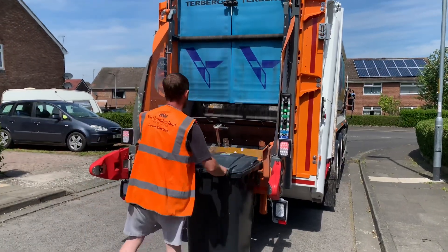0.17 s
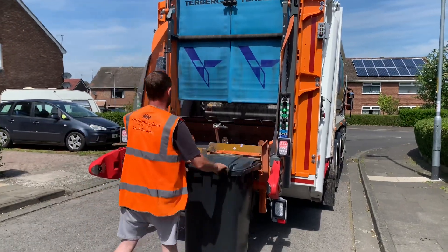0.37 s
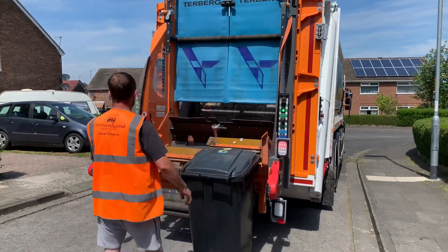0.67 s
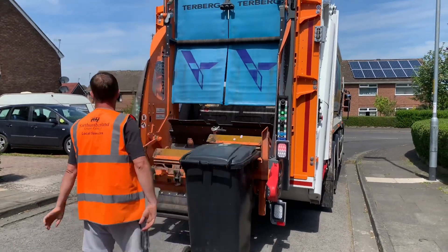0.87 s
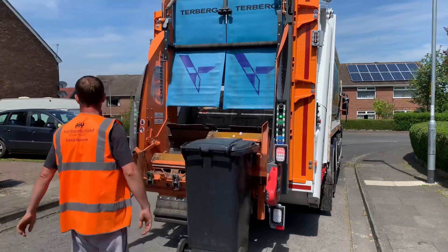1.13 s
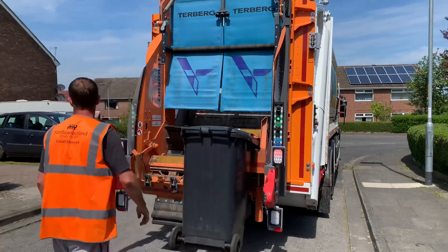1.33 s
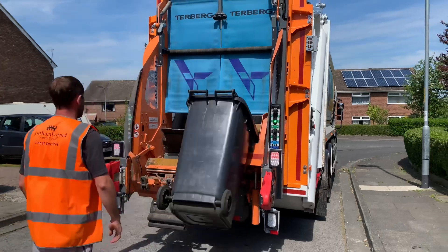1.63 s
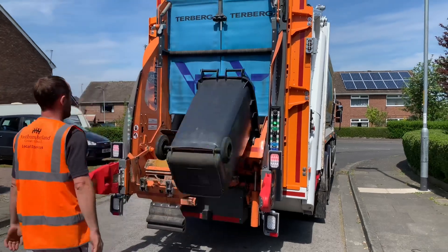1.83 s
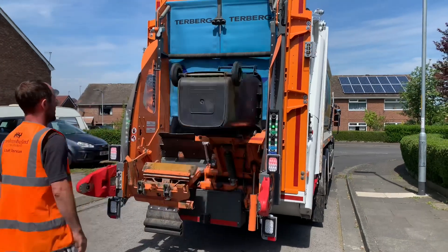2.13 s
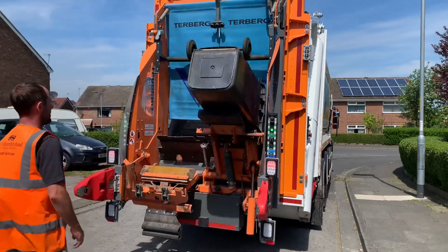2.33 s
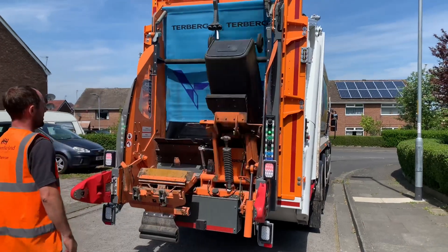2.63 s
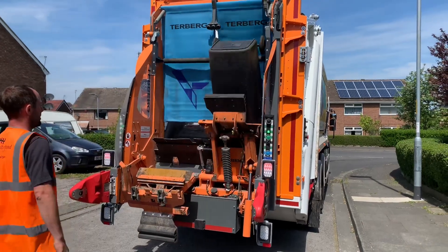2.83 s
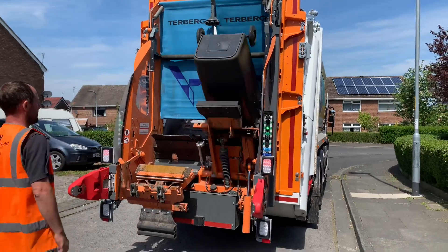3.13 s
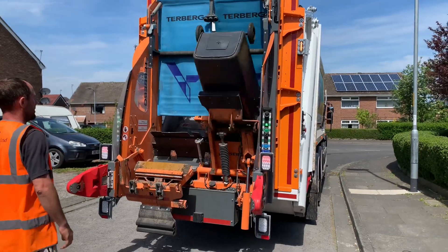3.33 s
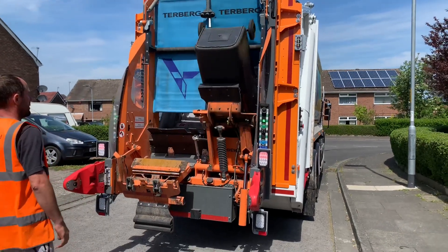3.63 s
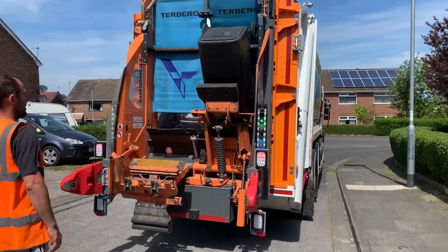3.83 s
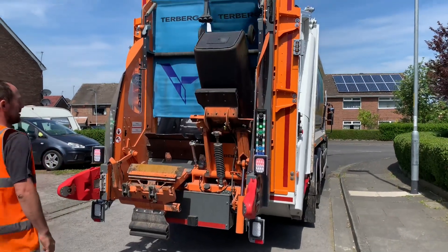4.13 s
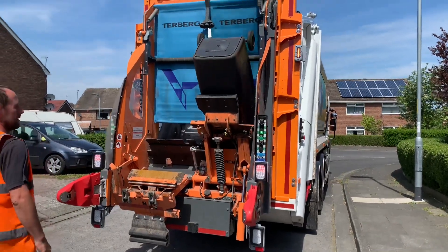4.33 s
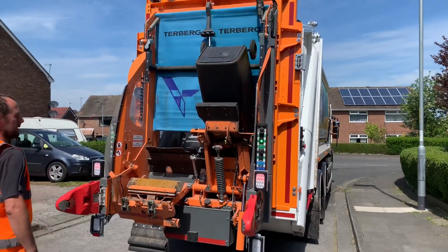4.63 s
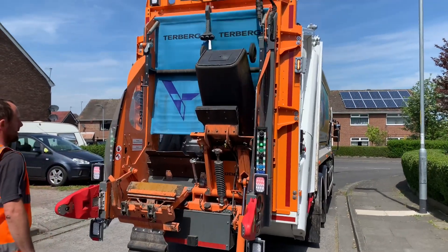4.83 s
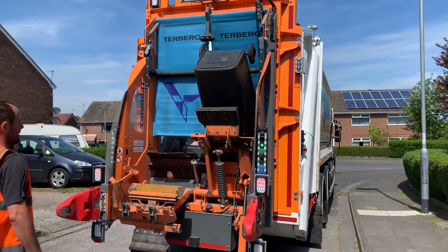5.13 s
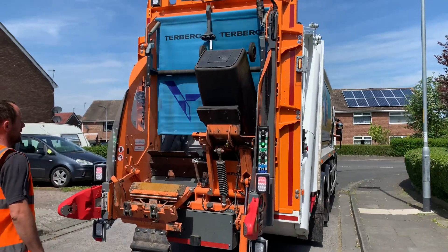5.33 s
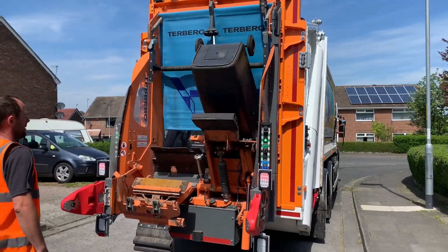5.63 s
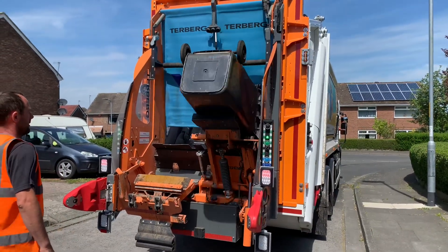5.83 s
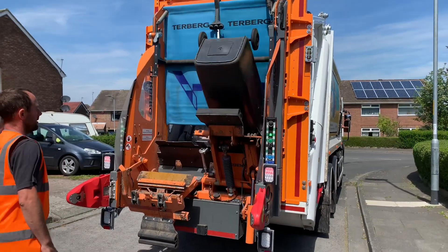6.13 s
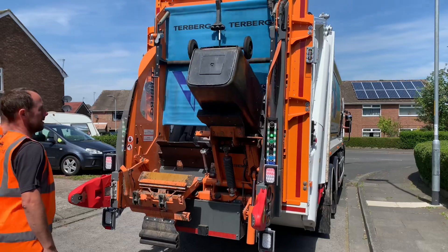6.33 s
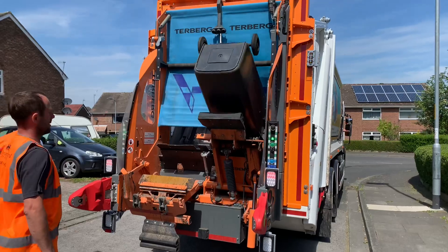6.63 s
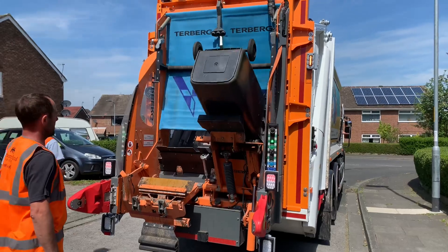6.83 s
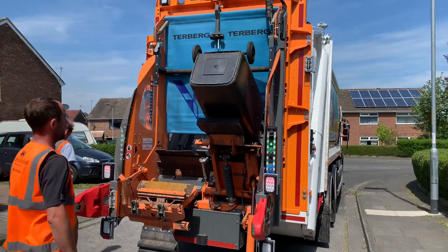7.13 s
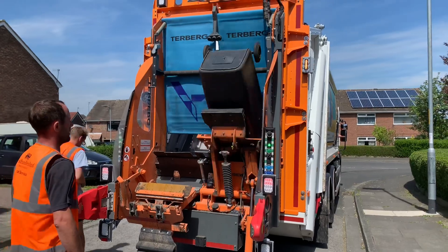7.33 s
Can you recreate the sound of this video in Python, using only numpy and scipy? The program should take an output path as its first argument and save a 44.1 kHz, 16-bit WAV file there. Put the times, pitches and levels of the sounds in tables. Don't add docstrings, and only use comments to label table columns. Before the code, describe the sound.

A refuse truck's hydraulic lift hisses and whistles as a plastic wheelie bin bangs, shakes out rattling rubbish, with wind buffeting the microphone.

```python
import sys
import numpy as np
from scipy import signal
from scipy.fft import rfft, irfft, next_fast_len
from scipy.io import wavfile
from scipy.ndimage import uniform_filter1d, map_coordinates

SR = 44100
rng = np.random.default_rng(int(sys.argv[2]) if len(sys.argv) > 2 else 0)


def convert_level_to_amplitude(level_db):
    exponent = np.asarray(level_db, float) / 20
    return 10 ** exponent


def int16_out(signal):
    q = np.round(np.clip(np.atleast_2d(signal).T, -1, 1) * 32767)
    wavfile.write(sys.argv[1], SR, q.astype(np.int16))


N = 330309


def unit(x):
    return x / np.sqrt(np.mean(x ** 2) + 1e-20)


def along(points, hz):
    f, v = np.transpose(points)
    return np.interp(np.log(hz + 1), np.log(f + 1), v)


def curves(rows):
    s, *cols = np.transpose(rows)
    return [np.interp(np.arange(N) / SR, s, c) for c in cols]


def wobble(rate_hz):
    coarse = np.arange(0, N + 8, 8)
    knots = rng.standard_normal(int(N * rate_hz / SR) + 4)
    return np.interp(np.arange(N), coarse, map_coordinates(knots, [coarse * rate_hz / SR]))


def filtered(x, response):
    m = next_fast_len(N + 8192)
    return irfft(rfft(x, m) * response(np.fft.rfftfreq(m, 1 / SR)), m)[..., :N]


def rush(spectrum, patchy_db=0):
    z = signal.stft(rng.standard_normal((2, N)), nperseg=512)[2]
    field = uniform_filter1d(rng.standard_normal(z.shape[1:]), size=6, axis=0)
    field = uniform_filter1d(field, size=8, axis=1)
    pair = signal.istft(z * convert_level_to_amplitude(patchy_db * unit(field)), nperseg=512)[1][:, :N]
    return unit(filtered(pair, lambda hz: convert_level_to_amplitude(along(spectrum, hz))))


def bursts(times_s, dbs, t60s, rise_s=0.0026):
    power, t = np.zeros(N + SR), np.arange(SR // 3) / SR
    for s, db, t60 in zip(times_s, dbs, t60s):
        decay = convert_level_to_amplitude(db - 60 * t / max(t60, .01))
        power[round(s * SR):][:len(t)] += (decay * (1 - np.exp(-t / rise_s))) ** 2
    return np.sqrt(power[:N])


def swells(times_s, dbs, rises, falls):
    coarse = np.arange(0, N + 64, 64)
    late = coarse[:, None] / SR - times_s
    drop_db = 10 * np.maximum(late / np.abs(falls), -late / np.abs(rises))
    power = convert_level_to_amplitude(2 * (dbs - drop_db)).sum(axis=1)
    return np.interp(np.arange(N), coarse, np.sqrt(power))


def ring(rows, rise_s=0.0016):
    out, t = np.zeros(N + SR), np.arange(SR // 2) / SR
    for s, db, hz, t60 in rows:
        swell = convert_level_to_amplitude(db - 60 * t / t60) * (1 - np.exp(-t / rise_s))
        out[round(s * SR):][:len(t)] += swell * np.sin(2 * np.pi * hz * t)
    return out[:N]


# opens_s, shuts_s, hiss_db, whistle_start_hz, whistle_db
PUSHES = [(0.0, 0.986, -36.5, 10550, -44.5), (0.997, 1.453, -37.5, 6570, -59),
          (1.466, 1.597, -37.5, 7300, -48), (1.6, 1.89, -36, 7250, -45.5), (1.892, 2.203, -35, 7370, -44.5),
          (2.198, 2.528, -34.5, 7140, -44.5), (2.535, 2.594, -33, 7320, -45),
          (2.622, 2.842, -50, 7600, -52.5), (2.842, 2.954, -31.5, 11060, -60),
          (2.957, 3.026, -32, 11200, -41), (3.044, 3.076, -29, 11020, -40),
          (3.068, 3.208, -29.5, 11120, -36.5), (3.219, 3.29, -35, 9200, -57),
          (3.311, 3.412, -29.5, 10900, -38), (3.404, 3.507, -27.5, 10530, -39.5),
          (3.512, 4.147, -35, 10320, -37.5), (5.002, 5.5, -54.5, 7040, -80),
          (5.545, 6.242, -48, 9120, -79.5), (6.235, 6.344, -35, 10200, -44.5),
          (6.339, 6.423, -33, 11000, -40.5), (6.433, 7.117, -34.5, 11220, -39),
          (7.119, 7.223, -48, 8420, -65), (7.226, 7.29, -35.5, 8850, -39), (7.296, 7.355, -45, 9000, -60),
          (7.36, 7.43, -36, 9520, -39), (7.438, 7.602, -34.5, 10040, -37.5)]
TOP_S, SHAKEN_S = 2.7, 5
LIFT_HZ, LOWER_HZ = 6600, 6110
LIFT_S, LOWER_S, AGAIN_S = .11, .175, .125
STICK = .5
SURGE_DB, SHRILL_DB, LEAK_DB = 1, 6.5, -61


def spool():
    t = np.arange(N) / SR
    current = np.searchsorted(np.transpose(PUSHES)[0][1:], t)
    opens_s, shuts_s, hiss_db, start_hz, whistle_db = np.array(PUSHES)[current].T
    travel = (t - opens_s) / np.select([t < TOP_S, t < SHAKEN_S], [LIFT_S, LOWER_S], AGAIN_S)
    narrow = np.exp(STICK - np.hypot(travel, STICK))
    open_hz = np.where(t < TOP_S, LIFT_HZ, LOWER_HZ)
    centre_hz = open_hz + (start_hz - open_hz) * narrow
    flowing = lambda db: uniform_filter1d(convert_level_to_amplitude(db) * (t < shuts_s), size=1100)
    shrill = flowing(whistle_db + SHRILL_DB * narrow)
    flow = flowing(hiss_db + SURGE_DB * narrow) + convert_level_to_amplitude(LEAK_DB)
    return centre_hz, shrill, flow


# freq_hz, level_db (per Hz)
OIL = [(1500, -5), (3000, -5.5), (5000, -2.5), (6500, -2), (8200, 4), (12000, 2.5), (15500, 4),
       (16500, -13)]
RAGGED_RAD = .85


def valve():
    centre_hz, shrill, flow = spool()
    angle = 2 * np.pi * np.cumsum(centre_hz * (1 + 0.01 * wobble(30))) / SR

    def fuzz(width_hz):
        noise = rng.standard_normal((2, N))
        return unit(filtered(noise, lambda hz: 1 / (1 + (hz / width_hz) ** 2)))

    near, wide = fuzz(330), fuzz(600)
    tone = near * np.cos(angle + RAGGED_RAD * (centre_hz / LOWER_HZ - 1) * wide[0])
    octave = convert_level_to_amplitude(-3) * wide * np.cos(2 * angle) * (centre_hz < SR / 5)
    hiss = flow * convert_level_to_amplitude(3.0 + 1.0 * wobble(30)) * rush(OIL, patchy_db=1.4)
    return hiss + shrill * convert_level_to_amplitude(6.0) * (tone + octave)


# start_s, crack_db, boom_db, knock_db (boom and knock relative to crack)
BLOWS = [(0.194, -28, -15, 15.5), (0.263, -19, 12, -4), (0.7608, -23.5, 12.5, -1.5), (1.378, -23, 5, -4),
         (1.397, -17.5, 6.5, -7), (1.4408, -23, 13, 9.5), (1.902, -24, -18, -25), (2.37, -23, -1.5, -7),
         (2.5894, -36.5, 11, 17.5), (2.7725, -22.5, -15, 4), (2.8516, -21, 8.5, 5), (3.073, -20.5, 5, -11),
         (3.151, -16.5, 11.5, 5.5), (3.197, -16.5, -7, -6), (3.3198, -26.5, 18, 7),
         (3.3582, -15, 10.5, 6.5), (3.4995, -27, 18.5, 16), (4.169, -29, 11, 8.5),
         (4.2273, -24.5, 10.5, -16), (5.0715, -27.5, -15, 1), (5.5504, -29.5, -3, 6.5),
         (5.5773, -22, -6, -12), (5.7335, -24.5, 5, 4), (5.7522, -22, 12, 9), (5.881, -23.5, 12, 1.5),
         (5.9434, -21.5, -11, 0.5), (6.111, -23.5, -11, -6), (7.154, -27, 7, 8), (7.177, -22.5, 5, 2),
         (7.42, -26.5, 16.5, 10), (0.445, -26.5, 6, -6), (0.61, -24.5, -3, 2), (1.362, -27, 12, 4.5),
         (1.466, -27, 1, 1), (1.492, -23.5, 5, -4), (1.541, -27, -0.5, -14), (1.596, -23, 1, -10),
         (2.622, -30.5, 16, 6), (2.815, -45, 3, 3), (3.047, -29, 4, 2), (3.134, -29.5, 8, 9),
         (3.24, -20, -5, -13), (3.41, -18, 4, -11), (3.551, -35, 9, 4), (5.785, -24, 0, -15),
         (7.238, -26, 1, 5), (7.381, -34, 6, 10)]
# freq_hz, level_db (per Hz)
BOOM = [(60, -15), (150, -3), (280, 3), (500, -5), (800, -13.5), (1500, -67)]
KNOCK = [(400, -33), (750, 6), (1300, 2), (2000, -6), (3000, -23)]
CRACK = [(1200, -5), (2200, 5.5), (4000, -4.5), (7000, -4), (12000, -12), (16000, -19)]


def bin_blows():
    s, db, boom_db, knock_db = np.transpose(BLOWS)
    t60_s = 0.17 * convert_level_to_amplitude(0.29 * (db + 22.5))
    snap = bursts(s, db - 3, .12 * t60_s, rise_s=.0002)
    crack = (snap + bursts(s, db - 12.5, 1.1 * t60_s)) * rush(CRACK)
    knock_body = bursts(s, db + knock_db - 6.5, 1.36 * t60_s, rise_s=0.00082)
    knock = (snap * convert_level_to_amplitude(-26.0) + knock_body) * rush(KNOCK, patchy_db=4.0)
    boom = bursts(s, db + boom_db - 5.5, 2.0 * t60_s, rise_s=0.0051) * rush(BOOM)
    return crack + knock + boom


# start_s, peak_db, pitch_hz, t60_s
HOLLOW = [(.262, -11, 820, 0.043), (1.39, -20, 803, 0.077), (1.44, -5.5, 195, 0.21),
          (3.012, -13, 850, 0.064), (3.021, -5.5, 873, 0.076), (2.875, -18, 764, 0.12),
          (2.855, -23, 1316, 0.091), (3.156, -17, 795, 0.28), (3.36, -13.5, 816, 0.15),
          (3.42, -19, 766, 0.2), (3.362, -18, 531, 0.15), (3.365, -20, 1118, 0.13), (3.5, -19, 1184, 0.07),
          (.196, -28, 2300, .08), (5.498, -26.5, 647, .2), (5.572, -29, 1003, .12), (5.669, -27.5, 715, .1),
          (5.941, -16.5, 1220, 0.041), (6.112, -26, 2096, 0.062), (5.89, -23, 1210, 0.063),
          (3.154, -5, 248, 0.14), (3.39, -2, 272, 0.29), (5.068, -26, 873, 0.16), (5.072, -22.5, 737, 0.1),
          (5.11, -31, 786, .15), (5.165, -32.5, 850, 0.16), (5.195, -35, 907, .2), (5.335, -41, 814, 0.24),
          (5.73, -11.5, 785, 0.077), (5.75, -15, 1320, 0.055), (5.96, -15.5, 1274, 0.055),
          (7.153, -18.5, 778, 0.064)]
# start_s, peak_db, pitch_hz
FRONTS = [(0.194, -12, 850), (0.263, -10, 830), (0.32, -26, 756), (1.395, -17, 832), (1.44, -23, 834),
          (2.648, -13, 703), (2.855, -15, 1280), (3.152, -9, 790), (3.327, -7, 780), (3.359, -11, 896),
          (4.384, -28, 786), (4.566, -25, 821), (5.733, -9, 748), (6.108, -23, 960), (6.175, -20, 864)]
FRONT_T60_S = 0.016


def hollow_notes():
    notes = ring(HOLLOW, rise_s=0.0021)
    fronts = ring([(*row, FRONT_T60_S) for row in FRONTS], rise_s=0.00023)
    return (notes + fronts) * [[1], [.4]]


# start_s, peak_db
SNAPS = [
    (2.8495, -31),
    (3.1515, -13),
    (7.1525, -36),
]
# freq_hz, level_db (per Hz)
STEEL = [(800, -22), (2000, 4), (6000, 2), (12000, -11), (15800, -8), (16600, -50.5)]


def snaps():
    s, db = np.transpose(SNAPS)
    return bursts(s, db, 0.0095 + 0 * s, rise_s=0.00018) * rush(STEEL)


# start_s, peak_db
RATTLES = [(1.4, -20.5), (2.6594, -29), (2.755, -23), (2.8419, -23), (2.9636, -21), (3.051, -26),
           (3.1512, -28), (3.3062, -19.5), (4.2275, -30), (5.072, -24.5), (5.1592, -41), (5.3817, -37),
           (5.4889, -41), (5.5468, -29), (5.5747, -25), (5.732, -31), (5.781, -36.5), (5.8316, -37),
           (5.885, -29.5), (5.94, -28), (5.9686, -26), (6.038, -25), (6.1045, -25.5), (6.1566, -21.5),
           (6.2437, -28), (6.3176, -38), (6.4597, -29), (7.1526, -36), (7.233, -34), (7.367, -30)]
# freq_hz, level_db (per Hz)
TICK = [(3000, -23), (6000, -6.5), (8500, 8), (11000, 4), (13000, 0), (16000, -3.5)]


def rubbish():
    s, db = np.transpose(RATTLES)
    tick = bursts(s, db - 4, .02 + 0 * s, rise_s=.0002)
    rattle = bursts(s, db - 7.0, 0.12 + 0 * s, rise_s=0.0008) * convert_level_to_amplitude(1.8 * wobble(150))
    return (tick + rattle) * rush(TICK, patchy_db=-3)


# peak_s, level_db, fall_s (per 10 dB)
SLIDES = [(0.0, -26, 0.3), (.25, -28, 0.67), (1.43, -25, 0.26), (1.77, -34.5, 1), (2.64, -25.5, 0.35),
          (2.87, -23, 0.25), (3.05, -27, 0.3), (3.2, -19, 0.1147), (3.36, -20.5, 0.25), (4.2, -35, 0.2),
          (4.44, -41.5, 0.5), (5.07, -45, 0), (5.4, -40.5, 0.5), (5.57, -33.5, 1), (5.74, -32.5, 0.2),
          (5.93, -30, 0.3), (6.27, -29, 0.66), (6.5, -25.5, 0.08), (6.88, -31.5, 0.5), (7.18, -32.5, 0.5),
          (7.48, -25.5, .5)]
SLIDE_RISE_S = 0.071
# freq_hz, level_db (per Hz)
LOAD = [(250, -31), (500, 0), (800, -2.5), (1300, -7.5), (2000, -11), (3500, -18), (7000, -25.5)]


def load():
    s, db, fall_s = np.transpose(SLIDES)
    clumps = unit(convert_level_to_amplitude(1.93 * wobble(70)) * rush(LOAD, patchy_db=2.5))
    return swells(s, db - 1.0, SLIDE_RISE_S, fall_s) * clumps


# time_s, main_db (fourth order), rest_db (other orders)
PUMP = [(0, -28.5, -34), (1.3, -35.5, -51), (1.5, -23.5, -36.5), (1.9, -23.5, -33), (2.05, -37.5, -43),
        (2.12, -44, -58), (2.2, -35, -65), (2.6, -33.5, -59), (3.0, -22.5, -57.5), (3.3, -33, -58),
        (4.9, -64, -72.5), (4.95, -31.5, -66), (5.1, -31.5, -72), (5.4, -25, -85), (5.7, -30.5, -62),
        (7.1, -31.5, -69), (7.3, -29, -47), (7.49, -19.5, -33.5)]
# multiple (of shaft speed), level_db
ORDERS_DB = [(3, -29), (5, -2), (6, -2)]
# time_s, shaft_hz
SHAFT = [(0, 85.2), (2.04, 85.2), (2.14, 86.5), (2.55, 86.5), (2.7, 85.2), (7.49, 85.15)]


def pump():
    main_db, rest_db = curves(PUMP)
    shaft_hz = curves(SHAFT)[0] * (1 + .001 * wobble(4) + .006 * wobble(30))
    angle = 2 * np.pi * np.cumsum(shaft_hz) / SR
    rest = np.zeros(N)
    for k, db in ORDERS_DB:
        rest += convert_level_to_amplitude(db - 3 + 8 * wobble(15)) * np.sin(k * angle + rng.uniform(0, 6))
    main = convert_level_to_amplitude(main_db - 3.5 + 2.6 * wobble(11)) * np.sin(4 * angle)
    hum = main + convert_level_to_amplitude(rest_db - 3.5) * rest
    return np.sqrt(2) * hum * [[1], [.3]]


# freq_hz, level_db (per Hz)
ENGINE = [(250, -10.5), (750, 0), (1000, -1.5), (1280, 3), (1650, -4.5), (2300, -5.5), (5500, -18),
          (9000, -20.5), (15800, -26.5)]


def engine():
    return convert_level_to_amplitude(-40.5) * rush(ENGINE, patchy_db=2.0)


# peak_s, strength_db, fall_s (per 10 dB), sharpness_db (flutter over thud)
GUSTS = [(0.04, -11.5, 0.1, -6), (.26, -18.5, 0.13, 0.5), (.52, -19, 0.44, -3), (.72, -20, 0.2, -1),
         (.87, -13, 0.07, -4), (1.07, -26.5, 0.2, -3.5), (1.452, -19.5, 0.1558, 8), (1.62, -29, 0.23, -4),
         (1.83, -20, 0.25, -4), (2.23, -26, 0.2, -9), (2.651, -22, 0.11, 3), (2.76, -23, 0.18, 4.5),
         (2.88, -21.5, 0.16, 2.5), (3.01, -21.5, 0.09, 4.5), (3.18, -17, 0.09, -1.5),
         (3.419, -14, 0.28, -11.5), (3.75, -21, 0.2, 4), (4.14, -21, .12, -0.5), (4.44, -17.5, 0.2552, 2.5),
         (4.64, -15, 0.05, 0), (4.78, -21.5, 0, -9), (4.85, -19.5, 0.06, -9), (4.92, -23, -0.06, -1),
         (5.16, -27.5, -0.3, -8), (5.4, -37, -3, -4), (5.58, -28, 0.2, -0.5), (5.76, -28, 0.06, 7),
         (5.93, -15.5, 0.16, -6.5), (6.17, -17, 0.07, 0), (6.3, -21, 0.11, 5), (6.42, -14.5, 0.14, -3.5),
         (6.689, -20.5, 0.12, -1), (6.55, -17.5, 0.1, 4), (6.88, -28.5, -0.1, -7),
         (7.07, -31.5, 0.16, 12.5), (7.22, -21, -0.24, -5.5), (7.29, -32, 0.55, 1),
         (7.48, -21.5, 0.15, 4.5)]
CALM_DB = -41
GUST_RISE, FLUTTER_LASTS = 0.88, 0.83
# freq_hz, level_db (per Hz)
BUFFET = [(16, -55), (30, -32), (48, -5), (65, 1.5), (100, -1.5), (150, -8.5), (250, -15.5), (320, -29.5),
          (550, -120)]
FLUTTER = [(60, -9), (140, -2), (220, -1.5), (320, -5), (500, -13.5), (800, -32), (1400, -68.5)]


def gusts():
    s, db, fall_s, sharp_db = np.transpose(GUSTS)
    quick_s = FLUTTER_LASTS * fall_s
    thud = unit(convert_level_to_amplitude(1.7 * wobble(25)) * rush(BUFFET))
    flap = unit(convert_level_to_amplitude(3.4 * wobble(60)) * rush(FLUTTER))
    thud *= np.hypot(convert_level_to_amplitude(CALM_DB), swells(s, db + 1.5, GUST_RISE * fall_s, fall_s))
    flap *= np.hypot(convert_level_to_amplitude(CALM_DB + 2.0), swells(s, db + sharp_db, GUST_RISE * quick_s, quick_s))
    return thud + flap


# start_s, peak_db
SLAPS = [(0.642, -16), (0.761, -26), (0.893, -22.5), (3.719, -17), (3.734, -16), (3.764, -13.5),
         (3.789, -13.5), (3.888, -13), (4.316, -18.5), (4.35, -15), (4.387, -16.5), (4.414, -7),
         (4.442, -16), (4.464, -14.5), (4.499, -17), (4.566, -17.5), (4.588, -17), (4.601, -22),
         (4.617, -19.5), (4.65, -10), (6.109, -15.5), (6.175, -16), (6.196, -10.5), (6.261, -10.5),
         (6.287, -14), (6.413, -18), (6.444, -15), (6.49, -13), (6.545, -12), (6.563, -6), (4.283, -28.5),
         (4.483, -22), (4.518, -26), (4.683, -23.5), (6.39, -18), (6.623, -21), (6.851, -32),
         (6.894, -20.5), (0.569, -32), (6.049, -18.5)]
SHED_DB, SHED_S = -13.5, .035


def slaps():
    out, t = np.zeros(N + SR), np.arange(2048) / SR
    for (s, db), chance in zip(SLAPS, rng.uniform(-1, 1, (len(SLAPS), 3, 3))):
        for small, (spread, turn, shift) in zip((0, 1, 1), chance):
            pitch_hz = (180 + 1000 * np.exp(-t / 0.00217)) * (1 + 0.13 * spread)
            peak_db = db + 2.0 + small * SHED_DB
            swell = (1 - np.exp(-t / 0.0016)) * convert_level_to_amplitude(peak_db - 60 * t / 0.043)
            start = round((s + small * shift * SHED_S) * SR)
            phase = 2 * np.pi * np.cumsum(pitch_hz) / SR + np.pi * turn
            out[start:][:len(t)] += swell * np.sin(phase)
    return out[:N]


# freq_hz, level_db (per Hz)
SPIT = [(100, -15), (300, -0.5), (600, 0), (1100, -15.5), (2000, -24.5), (3000, -63)]


def spit():
    s, db = np.transpose(SLAPS)
    return bursts(s, db - 2.5, 0.053 + 0 * s, rise_s=.0015) * rush(SPIT)


# start_s, peak_db, pitch_hz, t60_s
THUMPS = [(.232, -7, 87.6, 0.23), (.775, -1.5, 69, 0.16), (.845, -7, 94, .12), (.875, -19, 70, 0.09),
          (1.345, -10.5, 137, 0.15), (1.49, -6, 90, 0.11), (2.185, -15, 98, .12), (2.62, -18, 180, 0.083),
          (3.44, -7, 93, 0.36), (3.165, -6, 204, 0.15), (6.297, -4, 215, 0.049), (1.095, -12, 110, 0.066),
          (1.8, -14.5, 191, .2), (.892, -12, 75, .05), (4.78, -12, 130, 0.069), (3.615, -11, 89, 0.11),
          (3.73, -7.5, 120.5, 0.073), (3.978, -14.5, 104, 0.12), (4.091, -17, 134, 0.077),
          (4.385, -16, 110, 0.074), (4.48, -16, 99, 0.12), (4.652, -2, 203, 0.052), (5.14, -21, 113, .12),
          (5.567, -14, 91, 0.24), (5.757, -14, 237, 0.095), (6.19, -4, 131, .06), (6.285, -2, 151, .1),
          (6.33, -17, 59.4, 0.23), (6.06, -7, 75, 0.17), (6.085, -9, 85, .1), (6.155, -8, 150, .08),
          (6.425, -12, 95, 0.11), (6.46, -8, 121, 0.12), (6.64, -11, 119, .1), (5.975, -10, 110, .1),
          (4.14, -11, 150, 0.092)]


def wind():
    return gusts() + (slaps() + ring(THUMPS)) * [[1], [.6]] + spit()


# freq_hz, level_db
LEFT_DB = [(60, -0.5), (130, 0), (290, -0.5), (640, 2.5), (1410, 1), (3100, 0), (6820, -2), (15000, -0.5)]


def ports(pair, alike, lead):
    turn = lambda hz: np.arccos(np.clip(along(alike, hz), 0, 1)) / 2
    common, stray = filtered(pair, lambda hz: np.array([np.cos(turn(hz)), np.sin(turn(hz))]))

    def skew(hz):
        return np.exp(.5j * np.interp(hz, *np.transpose(lead))) * convert_level_to_amplitude(along(LEFT_DB, hz) / 2)

    both = np.array([common + stray, common - stray])
    return filtered(both, lambda hz: np.array([skew(hz), 1 / skew(hz)]))


# freq_hz, likeness (0-1)
ALIKE = [(60, .85), (400, .78), (800, .55), (1200, .6), (2500, .52), (3800, .2), (5400, .2), (6300, .7),
         (7500, .88), (16000, .88)]
# freq_hz, left_lead_rad
LEAD = [(0, 0), (600, .4), (1100, 1.2), (1800, -.6), (2800, 0), (3300, .6), (5900, 0), (8580, -np.pi),
        (11000, -2 * np.pi), (13550, -3 * np.pi), (15800, -4 * np.pi)]


def scene():
    truck = valve() + bin_blows() + hollow_notes() + rubbish() + load() + pump() + engine()
    air = ports(wind(), [(30, .83), (250, .82), (600, .58)], [(0, 0), (1000, .2)])
    return ports(truck, ALIKE, LEAD) + snaps() + air


TOP_HZ = 15900


def thrifty_stereo(x, margin_db, faint_db):
    sum_diff = np.array([x[0] + x[1], x[0] - x[1]]) / 2
    hz, _, z = signal.stft(sum_diff, SR, nperseg=2048)
    lines = np.abs(z[:, :1024]) ** 2
    bands = np.repeat(lines.reshape(2, 32, 32, -1).mean(axis=2), 32, axis=1)
    whim_db = 3.5 * uniform_filter1d(rng.standard_normal(lines.shape[2]), size=3)
    rival = bands[::-1] * convert_level_to_amplitude(whim_db - 2 * np.reshape(margin_db, (2, 1, 1)))
    weak = (bands < rival) & (hz[:1024, None] > 6400)
    faint = (lines < bands * convert_level_to_amplitude(2 * faint_db)) & (hz[:1024, None] > 1500)
    z[:, :1024] *= ~(weak | faint)
    both, apart = signal.istft(z * (hz[:, None] < TOP_HZ), SR, nperseg=2048)[1][:, :N]
    thinned = np.array([both + apart, both - apart])
    snap_s, count = np.transpose(SNAPS)[0], len(SNAPS)
    whole = np.minimum(1, bursts(snap_s - .003, np.full(count, 40), np.full(count, .012)))
    return filtered(thinned * (1 - whole) + x * whole, lambda hz: hz < 16400)


def top_cut(x):
    return signal.sosfilt(signal.butter(12, 17110, fs=SR, output="sos"), x)


def record(dry):
    soft = dry / (1 + np.abs(dry / .95) ** 4) ** (1 / 4)
    lean = thrifty_stereo(soft, margin_db=[6.6, 5.5], faint_db=-2.5)
    return top_cut(lean)


dry = scene()
out = record(dry)
int16_out(out)
```